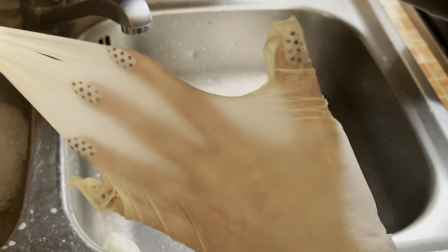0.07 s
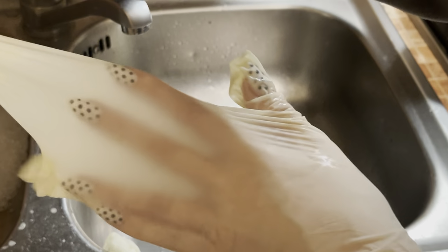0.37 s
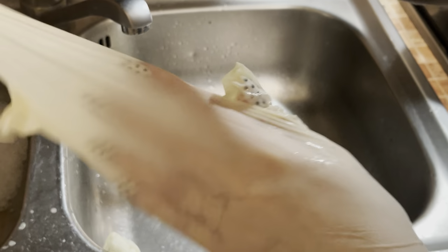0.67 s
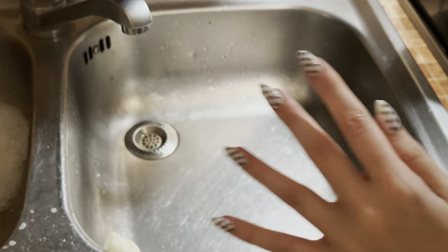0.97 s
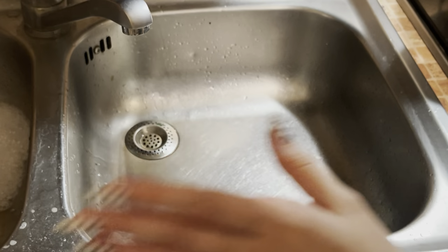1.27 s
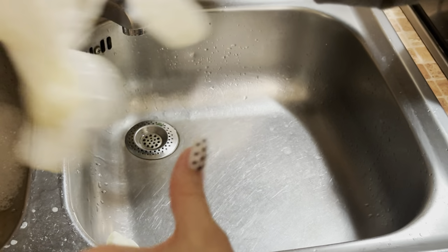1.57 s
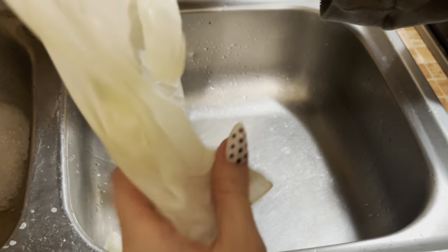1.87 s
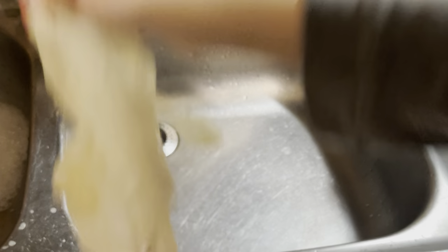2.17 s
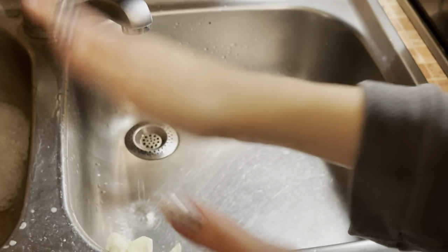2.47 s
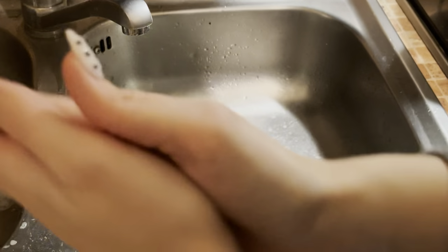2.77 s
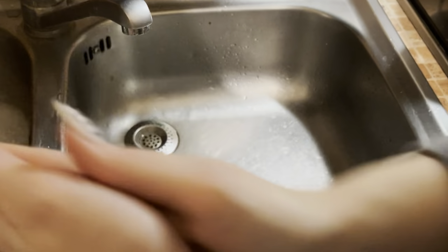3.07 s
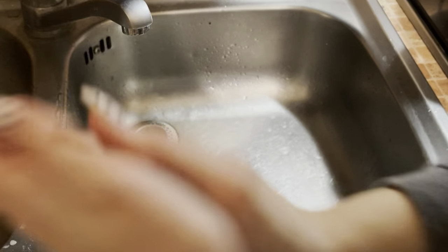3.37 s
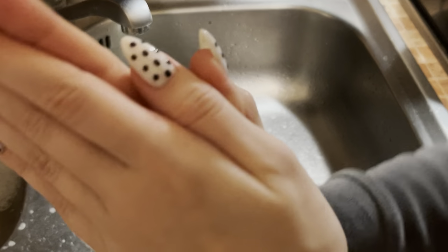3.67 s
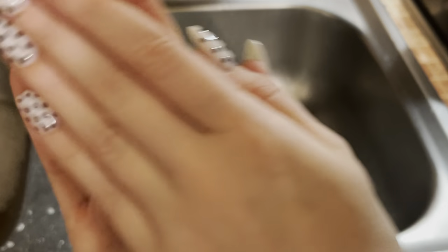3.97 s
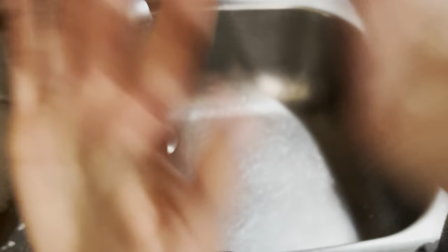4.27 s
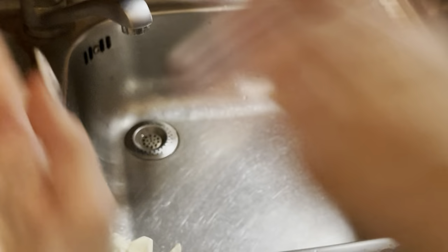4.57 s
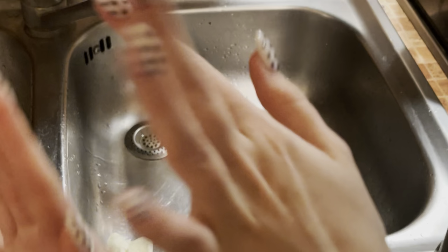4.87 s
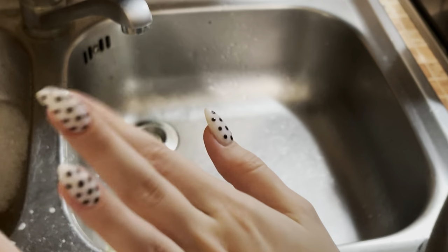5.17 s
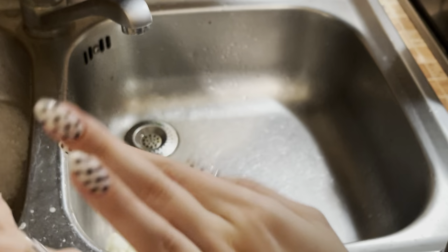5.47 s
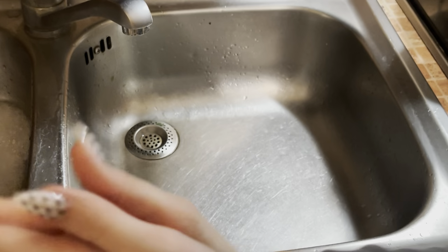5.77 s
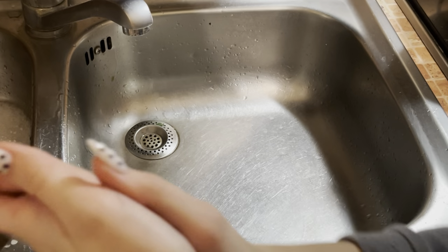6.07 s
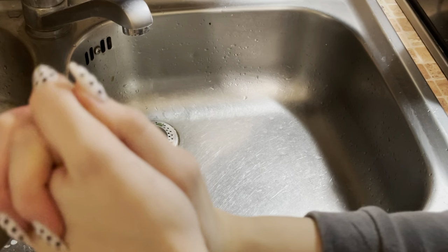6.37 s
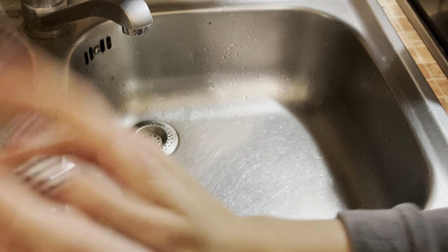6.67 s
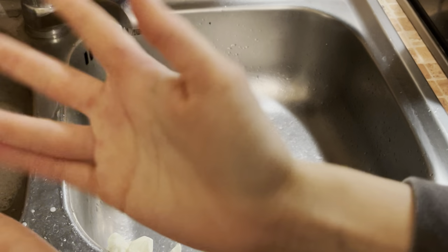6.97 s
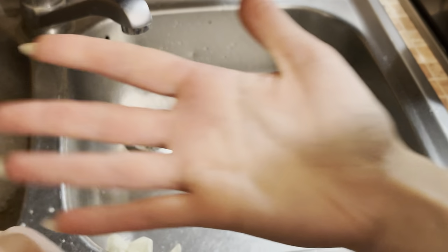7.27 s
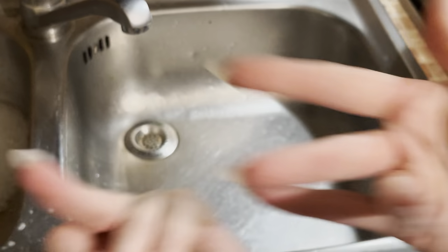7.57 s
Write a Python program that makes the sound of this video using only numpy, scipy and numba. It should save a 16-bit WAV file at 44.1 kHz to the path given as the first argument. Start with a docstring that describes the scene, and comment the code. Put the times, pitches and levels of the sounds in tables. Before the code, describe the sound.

A rubber glove creaks and slips in small jerks, then snaps off a hand and crumples softly. Wet bare palms meet in a sharp, loud clap and rub briskly, then slide more gently. A brief low gust buffets the microphone before a second, hollower clap and more faint rubbing. Everything is close, with a short echo from a steel sink and small kitchen, and a low appliance hum behind.

```python
"""In a small kitchen, over a steel sink, a latex glove is stretched, slips off in jerks, snaps free
and is dropped. Wet bare hands slap together, popping the air between them, then rub, slide apart and
slap again. The sink and the walls echo. A draught buffets the microphone, whose wind filter then
thins the bass for a while. An appliance hums behind it all."""
import sys
import numpy as np
from scipy import signal
from scipy.fft import rfft, irfft, next_fast_len
from scipy.io import wavfile
from scipy.ndimage import uniform_filter1d
from numba import njit

SR = 44100
rng = np.random.default_rng(int(sys.argv[2]) if len(sys.argv) > 2 else 0)


def wav_out(sig):
    """Save sig, one row per channel (or a flat mono array), as 16-bit PCM at SR to the path in sys.argv[1]."""
    wavfile.write(sys.argv[1], SR, np.round(np.clip(np.atleast_2d(sig).T, -1, 1) * 32767).astype(np.int16))


N = 340452
T = np.arange(N) / SR


# rubber jerking over skin: start_s, length_s, level_db
JERKS = [(.005, 0.017, -53.5), (0.075, 0.036, -51), (0.143, 0.016, -48), (0.161, .022, -35),
         (.423, 0.0088, -49.5), (0.464, 0.012, -41.5), (0.632, 0.012, -48.5), (0.644, .012, -43.5),
         (0.7331, 0.022, -26), (0.7536, .006, -16), (0.7695, 0.013, -16)]
# tone of tight rubber and of slack rubber: pitch_hz, level_db
TIGHT_TONE = [(180, -34), (330, -10), (1340, -5.5), (2250, -18), (3190, -4), (4440, -6.5), (8500, -3),
              (10000, -4.5), (11300, -8.5), (13800, -17.5), (16000, -21.5)]
SLACK_TONE = [(88, -42.5), (150, 0.5), (414, -18.5), (1560, -10), (1790, -12), (2100, -5.5), (2550, -6),
              (3220, -3.5), (4160, -9.5), (9080, -2.5), (10200, -4), (11700, -12.5), (16000, -46)]
def glove_jerks(off_s=0.7374, slacken_s=0.034, tight_flap_share=.15):
    """Each jerk is a rush of tiny slips ending in a thud; once off, the slack glove flaps lower."""
    tight, slack, rebounds = np.zeros((3, N))
    for start, length, db in JERKS:
        loudness = undb(db) * burst(length, rise_s=0.0023, fall_s=0.0039)
        flap = np.clip(tight_flap_share + max(start - off_s, 0) / slacken_s, 0, 1)
        add(tight, start, np.sqrt(1 - flap) * loudness)
        add(slack, start, np.sqrt(flap) * loudness)
        rebound_db = min(db + 3.5, -31)  # follows the jerk, but rubber can only swing so far
        add(rebounds, start + .75 * length, undb(rebound_db) * thud(hz=160, t60=0.086))
    slipping = colour(tight * grains(14000, spread_db=4.0), TIGHT_TONE)
    flapping = colour(slack * grains(14000, spread_db=2.5), SLACK_TONE)
    return slipping + flapping + rebounds


# pulls on the glove, and handfuls of it being crumpled: peak_s, length_s, level_db
PULLS = [(.01, 0.11, -57.5), (.16, 0.11, -54.5), (.47, 0.083, -59.5), (.74, 0.093, -42)]
CRUMPLES = [(1.28, 0.23, -56.5), (1.52, 0.062, -63.5), (1.98, 0.21, -56.5), (2.23, 0.083, -54.5),
            (2.32, 0.17, -52.5), (2.56, 0.26, -62)]
# tone of rustling rubber: pitch_hz, level_db
RUSTLE_TONE = [(530, -34.5), (900, -3.5), (1420, -6.5), (2480, -1.5), (4960, -5), (6280, -2.5),
               (8730, -2.5), (10200, -5.5), (11400, -8), (13700, -42.5), (15000, -52)]
def glove_rustle():
    """Stretched rubber creaks more and more until it gives; loose rubber crumples in the hand."""
    creak = swells(PULLS, rise=0.55, fall=0.46) * grains(7000, spread_db=0.5)
    handfuls = undb(1.5 * wander(60)) * swells(CRUMPLES, rise=.6, fall=0.53)
    folds = handfuls * grains(4900, spread_db=1.5)
    return colour(creak + folds, RUSTLE_TONE)


# puffs of air: start_s, length_s, level_db, pitch_hz
PUFFS = [(1.544, 0.11, -67.5, 4530), (2.189, .06, -54.5, 3800)]
def glove_puffs():
    """Air squeezed out of the glove makes a short, breathy hiss."""
    air = np.zeros(N)
    for start, length, db, hz in PUFFS:
        add(air, start, undb(db) * swish(length, hz, sink=0.12, width=0.099))
    return air


# the limp glove landing: start_s, length_s, level_db
FLOPS = [(1.69, .002, -61.5), (2.212, .0083, -53.5), (2.301, .02, -45.5)]
# tone of a flop: pitch_hz, level_db
FLOP_TONE = [(88, -27.5), (150, -2), (373, -9.5), (525, -14.5), (1380, -2.5), (1520, -1), (2400, -7.5),
             (8390, -18), (11400, -26.5), (12700, -42), (14000, -96)]
# soft knocks of the glove: start_s, pitch_hz, level_db, fade_s
THUDS = [(.768, 64.9, -30, .15), (2.3, 175, -49, .2), (2.48, 60, -47.5, .25)]
def glove_landing():
    """The freed glove flops and thuds against hand and counter."""
    flops, thuds = np.zeros((2, N))
    for start, length, db in FLOPS:
        add(flops, start, undb(db) * burst(length, rise_s=0.15 * length, fall_s=0.008))
    for start, hz, db, t60 in THUDS:
        add(thuds, start, undb(db) * thud(hz, t60))
    return colour(flops * grains(4900, spread_db=1.5), FLOP_TONE) + thuds


# palm meeting palm: start_s, closing_s, level_db, cupped_share, air_hz, air_db, squirt_hz, squirt_db
SLAPS = [(2.7212, .004, -8.5, 0, 996, -10, 9653, -2.5), (5.7572, 0.00338, -20.5, 0.83, 593, -13, 7260, -6)]
# notes of the closed palms: pitch_hz, level_db (relative to the smack), fade_s
PALM_NOTES = [(410, -3, .014), (900, -8.5, 0.0059), (1500, -10, .005)]
# tone of flat palms and of cupped palms: pitch_hz, level_db
FLAT_TONE = [(76, -31.5), (130, -2), (974, -5.5), (1290, -6.5), (1580, -4), (2140, -8), (2890, -4),
             (3910, -15), (5080, -12.5), (5850, -14), (9480, -16), (10300, -19), (11800, -16.5),
             (16000, -49)]
CUPPED_TONE = [(180, -26), (330, -8), (738, -8), (1520, -14), (1760, -19.5), (3220, -11.5), (5710, -12),
               (7300, -10.5), (9330, -11.5), (10500, -11.5), (11400, -27), (15000, -39)]
def hand_slaps(touch_lead_s=0.0056, touch_db=-11.5, rush_s=.022, rush_db=-40.5, flesh_db=-13):
    """The palms smack shut, pop the air trapped between them and squirt out a film of water."""
    flat, cupped, body = np.zeros((3, N))
    t = T[:SR // 10]
    for start, closing, db, cup, air_hz, air_db, squirt_hz, squirt_db in SLAPS:
        loudness = burst(closing, rise_s=.0003, fall_s=0.0023)[:len(t)]
        # the edges of the hands touch just before the palms
        for contact, contact_db in (start - touch_lead_s, db + touch_db), (start, db):
            smack = undb(contact_db) * rng.standard_normal(len(t)) * loudness
            add(flat, contact, (1 - cup) * smack)
            add(cupped, contact, cup * smack)
        pop = undb(air_db) * ring(t, air_hz, t60=6 / air_hz)
        squirt = undb(squirt_db) * ring(t, squirt_hz, t60=.004)
        flesh_thump = (1 - cup) * undb(db + flesh_db) * ring(t, hz=155, t60=.05)
        add(body, start, pop + squirt + flesh_thump)
        # air rushes out as the palms approach
        add(body, start - rush_s, undb(db + rush_db) * swish(rush_s, hz=1350, sink=-.3, width=.6))
        for hz, note_db, t60 in PALM_NOTES:
            add(body, start + closing / 2, undb(db + note_db) * ring(t, hz, t60))
    slaps = colour(flat, FLAT_TONE) + colour(cupped, CUPPED_TONE) + body
    return cut_lows(slaps, hz=115., damping=2.2)  # hands are too small to give off deep bass


# small wet ticks of rubber, skin and nails: start_s, strength_db, pitch_hz
TICKS = [(1.1042, -49.5, 2420), (1.17, -45.5, 2650), (1.3376, -47, 4260), (1.353, -47, 3280),
         (1.537, -59, 8750), (1.719, -57, 2970), (2.0933, -48, 1770), (4.2414, -26.5, 10000),
         (4.2767, -47, 11200), (5.452, -60, 7114), (6.2489, -54, 2890)]
def wet_ticks(ring_db=18.5, fizz_db=-8.5):
    """Sticky films part with a very short ring and a little fizz."""
    rings, fizz = np.zeros((2, N))
    t = T[:SR // 40]
    for start, db, hz in TICKS:
        add(rings, start, undb(db + ring_db) * ring(t, hz, t60=0.0014))
        add(fizz, start, undb(db + fizz_db) * rng.standard_normal(len(t)) * np.exp(-t / 0.0087))
    return cut_lows(rings + colour(fizz, RUSTLE_TONE), hz=1500., damping=4.4)


# brisk palm strokes: start_s, length_s, level_db, hollow_hz, hollow_db, sink_octaves
STROKES = [(2.768, .18, -47, 2570, -54, .3), (2.948, .11, -39.5, 1540, -50.5, 1.34),
           (3.079, .1, -41.5, 1950, -57.5, 0.31), (3.197, .11, -39.5, 1530, -59.5, 1.5),
           (3.325, .14, -49.5, 1300, -64.5, 0.27), (5.746, .18, -47.5, 2600, -68, .3),
           (5.964, 0.12, -54, 3560, -80, .1), (6.062, 0.16, -56, 3580, -70, .1),
           (6.575, .15, -60.5, 1360, -71.5, .1)]
# tone of rubbed skin: pitch_hz, level_db
RUB_TONE = [(350, -53), (600, -25.5), (1160, -20.5), (5480, -9.5), (8620, -2), (10200, -3), (11700, -7.5),
            (13200, -18), (13800, -44), (14500, -24.5), (16000, -28)]
def hand_rubbing(delay_share=0.15, open_share=0.54):
    """Skin ridges hiss with each stroke's speed; the hollow between the palms opens and sinks in pitch."""
    speed, hollow = np.zeros((2, N))
    for start, length, db, hz, hollow_db, sink in STROKES:
        add(speed, start, undb(db) * arch(length, power=.66))
        air = swish(open_share * length, hz, sink, width=0.14)
        add(hollow, start + delay_share * length, undb(hollow_db) * air)
    ridges = grains(12000, spread_db=0.5) * undb(1.4 * wander(110))
    return colour(speed * ridges, RUB_TONE) + hollow


# gentle hand movements: start_s, length_s, strength_db, swish_hz, swish_db, sink_octaves
HAND_MOVES = [(3.426, .62, -54, 610, -62, 0.18), (3.88, 0.69, -48, 2850, -59, 0.17),
              (6.149, 0.48, -66.5, 650, -72, 0.39), (6.529, 0.57, -64, 1870, -72, 0.54),
              (6.7, 0.74, -76.5, 810, -72, 1.2), (7.329, 0.18, -58, 7550, -65.5, .1),
              (7.62, 0.11, -63.5, 500, -69.5, .1)]
# tone of their soft hiss: pitch_hz, level_db
MOVE_TONE = [(180, -32), (300, 2.5), (692, -11.5), (1280, -14), (1600, -5.5), (1760, -11), (2900, -5.5),
             (5510, -9.5), (7010, -11), (8640, -9.5), (10100, -16.5), (11400, -20.5), (14000, -55)]
def hand_movements(hiss_db=-5.5):
    """Gentle movements give a soft, even hiss and a faint falling swish."""
    loudness, swishes = np.zeros((2, N))
    # the swishes at 6.529 s and 6.7 s are room noise reflecting off a moving hand
    for start, length, db, hz, swish_db, sink in HAND_MOVES:
        add(loudness, start, undb(db) * arch(length, power=0.94))
        add(swishes, start, undb(swish_db) * swish(length, hz, sink, width=0.29))
    return undb(hiss_db) * loudness * colour(noise(), MOVE_TONE) + swishes


# gusts at the microphone: start_s, length_s, level_db
GUSTS = [(4.898, .18, -51.5), (4.959, .07, -45), (5.066, 0.13, -21), (5.208, 0.042, -24.5),
         (5.277, 0.039, -31), (7.645, .1, -49.5)]
# the strongest swirls of air: start_s, peak_db
SWIRLS = [(5.084, -18.5), (5.107, -11), (5.128, -10), (5.162, -18), (5.213, -15), (5.254, -14.5)]
# tone of the rumble: pitch_hz, level_db
DRAUGHT_TONE = [(15, -44), (25, -33.5), (50, -9.5), (81, 1.5), (103, -11), (128, -8), (265, -16.5),
                (574, -40.5), (898, -73.5), (1000, -84.5), (1300, -120), (2200, -120)]
def draught(side_db=-11):
    """Rough air rumbles on the microphone and single swirls thump it, a little unevenly left and right."""
    flow = np.zeros(N)
    for start, length, db in GUSTS:
        add(flow, start, undb(db) * arch(length, power=0.51))
    push = flow * unit(undb(2 * wander(70)))
    mid, side = (colour(push * noise(), DRAUGHT_TONE) for _ in range(2))
    thump = response(DRAUGHT_TONE)
    for start, db in SWIRLS:
        knock = undb(db) * thump / np.abs(thump).max()
        add(mid, start, knock)
        add(side, start, rng.standard_normal() * knock)
    return widen(mid, undb(side_db) * side)


# tone of the echo: pitch_hz, gain_db
ECHO_TONE = [(60, -5.5), (200, -2), (500, 6.5), (1000, 4), (1800, 3), (2900, 1), (4500, 2), (9000, -2),
             (15000, -8)]
def room_echo(sound, bowl_fade_s=0.11, bowl_db=-14, wall_fade_s=0.42, wall_db=-12, side_db=-3):
    """Sound bounces quickly round the steel bowl of the sink, then fills the kitchen."""
    sound = convolve(sound, response(ECHO_TONE))
    bounces = (undb(bowl_db) * reflections(bowl_fade_s) + undb(wall_db) * reflections(wall_fade_s)
               for _ in range(2))
    mid, side = (convolve(sound, pattern) for pattern in bounces)
    # left and right differ mostly in the lower part of the echo
    side = signal.sosfilt(signal.butter(1, 2200, fs=SR, output="sos"), side)
    return widen(mid, undb(side_db) * side)


# tone of the room air: pitch_hz, level_db
AIR_TONE = [(25, -18.5), (55, 4.5), (80, -3.5), (130, -16.5), (180, -9.5), (260, -5.5), (450, -10.5),
            (700, -22), (1200, -36.5), (3000, -42), (9000, -36), (12000, -40.5), (15000, -65.5)]
def kitchen_hum(hum_hz=98.4, hum_db=-58.5, air_db=-61.5, air_side_db=-12, hum_side_db=-20):
    """An appliance hums, wavering, over a dull murmur of room air."""
    pitch = np.full(N, hum_hz)
    hum, hum_side = (undb(hum_db) * unit(band_and_high(noise(), pitch, 0.045)[0]) for _ in range(2))
    air, air_side = (undb(air_db + wander(9.6)) * colour(noise(), AIR_TONE) for _ in range(2))
    return widen(air + hum, undb(air_side_db) * air_side + undb(hum_side_db) * hum_side)


def undb(db):
    """Turn decibels into a multiplier."""
    return np.exp(np.asarray(db) * (np.log(10) / 20))


def unit(x):
    """Scale a sound to an average power of 1."""
    return x / np.sqrt(np.mean(x ** 2))


def noise():
    """An even hiss: white noise."""
    return rng.standard_normal(N)


def wander(turns_per_s):
    """A random drift above and below zero, about 1 in size."""
    points = rng.standard_normal(4096)
    return np.interp(T * turns_per_s, np.arange(len(points)), points)


def grains(clicks_per_s, spread_db):
    """Dense tiny clicks of uneven size."""
    dice, size = rng.random((2, N), dtype=np.float32)
    hits = np.flatnonzero(dice < clicks_per_s / SR)
    boost_db = spread_db * np.minimum(-np.log1p(-size[hits]), 4)
    clicks = np.zeros(N)
    clicks[hits] = noise()[hits] * undb(boost_db)
    return unit(clicks)


def ring(t, hz, t60):
    """A struck note that fades by 60 dB in t60 seconds."""
    return np.sin(2 * np.pi * hz * t) * np.exp(-np.log(1000) * t / t60)


def thud(hz, t60):
    """A soft, low knock of rubber."""
    return ring(T[:SR // 4], hz, t60) * burst(t60, rise_s=.0016, fall_s=0.044)


def swish(length, hz, sink, width):
    """A narrow hiss whose pitch drops by sink octaves, passing hz halfway."""
    along = np.linspace(-.5, .5, int(length * SR))
    pitch = hz * 2 ** (-sink * along)
    air = band_and_high(noise()[:len(along)], pitch, width)[0]
    return arch(length, power=0.7) * unit(air)


def reflections(t60):
    """Dense echoes that start after 2 ms and die away."""
    t = T[:int(.7 * SR)]
    decay = np.clip((t - .002) / 0.00077, 0, 1) * np.exp(-np.log(1000) * t / t60)
    return decay * rng.standard_normal(len(t)) / np.linalg.norm(decay)


def burst(length, rise_s, fall_s):
    """Loudness that swells, holds for its length and dies away."""
    t = T[:SR // 4]
    return (1 - np.exp(-t / rise_s)) * np.exp(-np.maximum(t - length, 0) / fall_s)


def swells(rows, rise, fall):
    """Loudness that grows to each peak and dies away; rise and fall are shares of the length."""
    power = np.zeros(N)
    for peak_s, length, db in rows:
        distance = np.maximum((peak_s - T) / rise, (T - peak_s) / fall) / length
        power += (undb(db) * np.exp(-distance)) ** 2
    return np.sqrt(power)


def arch(length, power):
    """A movement that speeds up and slows down again."""
    return np.abs(np.sin(np.linspace(0, np.pi, int(length * SR)))) ** power


def add(track, start_s, sound):
    """Mix a short sound into a track."""
    start = max(int(start_s * SR), 0)
    track[start:start + len(sound)] += sound[:N - start]


def response(tone, size=4096):
    """What a single click becomes when shaped by a tone table."""
    hz, db = np.transpose(tone)
    grid = np.maximum(np.fft.rfftfreq(size, 1 / SR), 1)
    gain = undb(np.interp(np.log(grid), np.log(hz), db))
    cepstrum = irfft(np.log(gain))
    # fold it so that nothing sounds before the click
    cepstrum[1:size // 2] *= 2
    cepstrum[size // 2 + 1:] = 0
    return irfft(np.exp(rfft(cepstrum)))


def convolve(x, click_response):
    """Pass a sound through a filter or an echo."""
    return signal.oaconvolve(x, click_response)[:N]


def colour(x, tone):
    """Give a hiss a tone and keep its power."""
    shape = response(tone)
    return convolve(x, shape / np.linalg.norm(shape))


@njit
def band_and_high(x, hz, damping):
    """A filter with a moving pitch; returns the sound near that pitch and the sound above it."""
    band, high = np.empty(len(x)), np.empty(len(x))
    band_state, low_state = 0., 0.
    for i in range(len(x)):
        step = np.tan(np.pi * hz[i] / SR)
        swing = (band_state + step * (x[i] + 1e-18 - low_state)) / (1 + step * (step + damping))
        band[i] = damping * swing
        high[i] = x[i] - damping * swing - low_state - step * swing
        band_state = 2 * swing - band_state
        low_state += 2 * step * swing
    return band, high


def cut_lows(x, hz, damping):
    """Thin out the low part of a sound."""
    return band_and_high(x, np.full(N, hz), damping)[1]


def widen(mid, side):
    """Make left and right: mid is what they share, side sets them apart."""
    return np.array([mid + side, mid - side])


def scene(directions=3):
    """Glove and hands close to the microphone, with their echo, the hum and the draught."""
    glove = glove_jerks() + glove_rustle() + glove_puffs() + glove_landing()
    handling = glove + wet_ticks() + hand_rubbing() + hand_movements()
    # a slap has different fine detail in each direction
    slap_echo = sum(room_echo(hand_slaps()) for _ in range(directions)) / np.sqrt(directions)
    return handling + room_echo(handling) + hand_slaps() + slap_echo + kitchen_hum() + draught()


def wind_filter(x, threshold_db=-33, react_s=0.2696, release_s=1.84, depth_db=-48, cut_hz=235):
    """Lasting rumble turns the bass down; it then creeps back."""
    rumble = signal.sosfilt(signal.butter(4, 110, fs=SR, output="sos"), x.mean(axis=0))
    windy = uniform_filter1d(rumble ** 2, SR // 16) > undb(threshold_db) ** 2
    since_wind_s = T - np.maximum.accumulate(np.where(windy, T, -np.inf))
    grip = uniform_filter1d(np.clip(1 - since_wind_s / release_s, 0, 1), SR // 12)
    late_grip = np.interp(T - react_s, T, grip)
    bass = signal.sosfiltfilt(signal.butter(2, cut_hz, fs=SR, output="sos"), x)
    return x - (1 - undb(depth_db * late_grip)) * bass


# tone of the microphone pair: pitch_hz, gain_db
MIC_TONE = [(20, 0.5), (8000, -1), (9600, 1), (11200, 4.5), (12300, -7), (13500, -1), (15500, -4)]
# how far the left microphone runs ahead of the right: pitch_hz, lead_radians
MIC_LEAD = [(0, 0), (1300, -.3), (3000, .55), (5200, .45), (6400, .05), (7800, .4), (8750, 0), (9400, -1.7),
            (10300, -3.14), (11850, -6.2), (12400, -6.5), (13600, -9.4), (15100, -12.6)]
def record(dry, peak_limit=.88, top_hz=15850):
    """Two microphones filter wind, tint the sound, round off its peaks and cut the highest treble."""
    x = np.array([convolve(channel, response(MIC_TONE)) for channel in wind_filter(dry)])
    size = next_fast_len(N + SR // 10)
    lead = np.interp(np.fft.rfftfreq(size, 1 / SR), *np.transpose(MIC_LEAD))
    shift = np.exp(.5j * np.array([lead, -lead]))
    x = irfft(rfft(x, size) * shift, size)[:, :N]
    rounded = x / (1 + (x / peak_limit) ** 6) ** (1 / 6)
    return signal.sosfilt(signal.ellip(8, .2, 70, top_hz, fs=SR, output="sos"), rounded)


dry = scene()
out = record(dry)
wav_out(out)
```